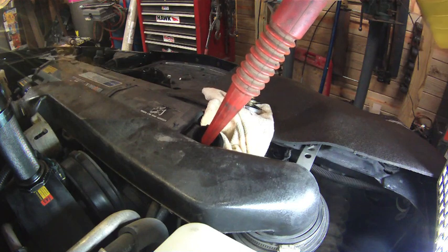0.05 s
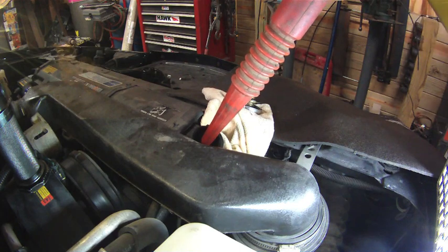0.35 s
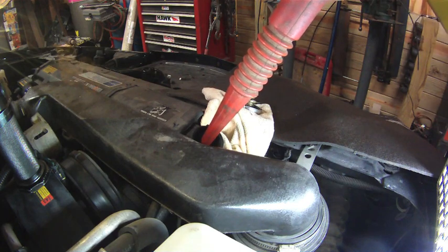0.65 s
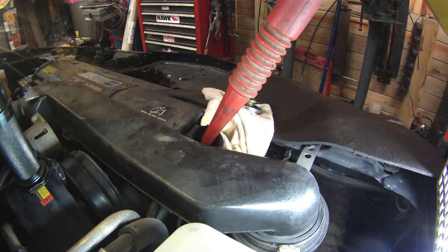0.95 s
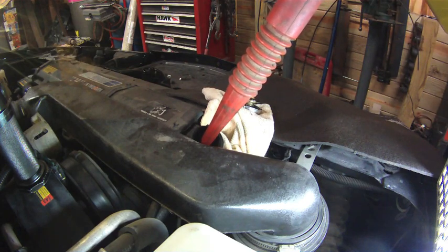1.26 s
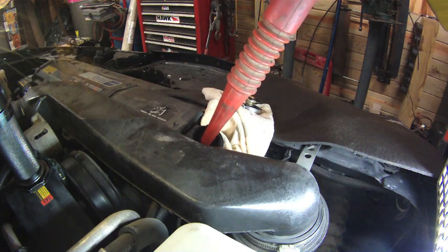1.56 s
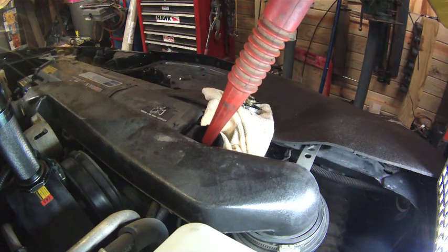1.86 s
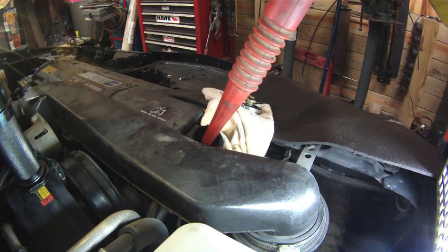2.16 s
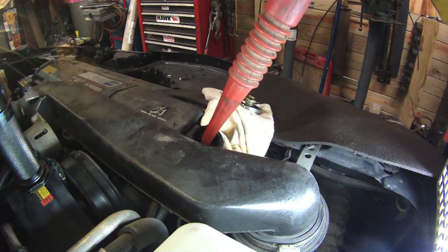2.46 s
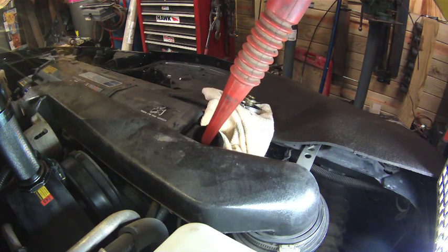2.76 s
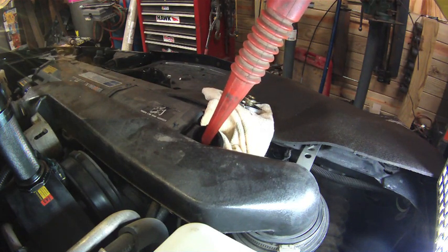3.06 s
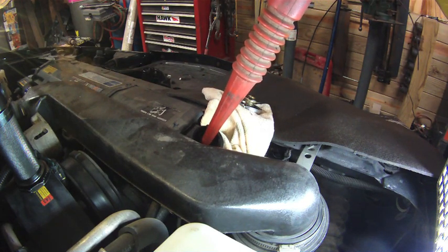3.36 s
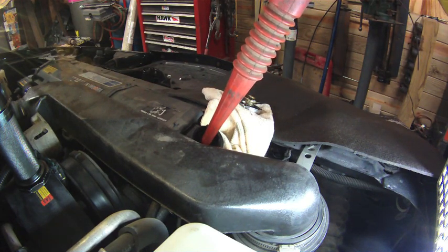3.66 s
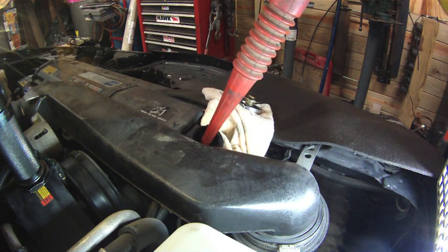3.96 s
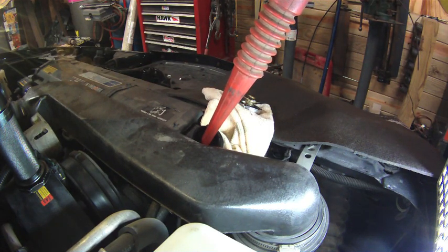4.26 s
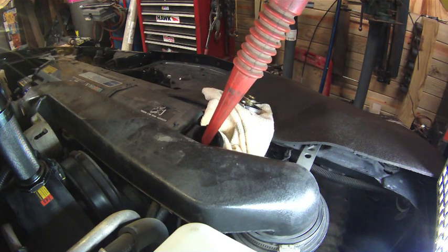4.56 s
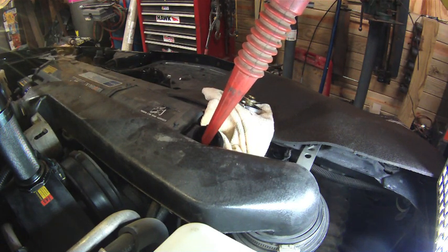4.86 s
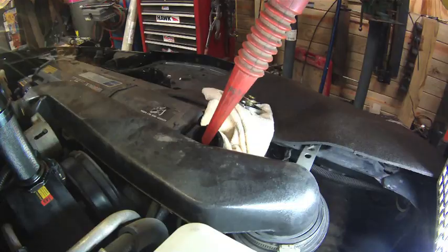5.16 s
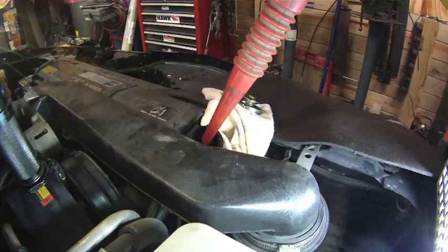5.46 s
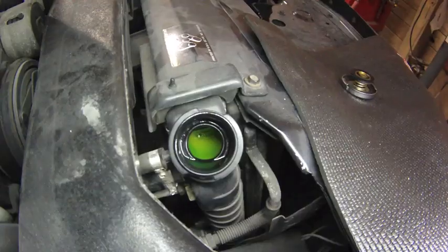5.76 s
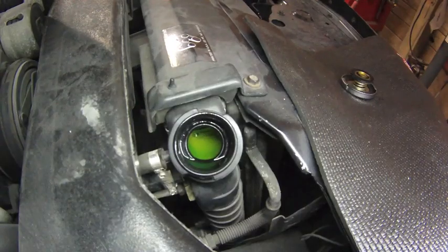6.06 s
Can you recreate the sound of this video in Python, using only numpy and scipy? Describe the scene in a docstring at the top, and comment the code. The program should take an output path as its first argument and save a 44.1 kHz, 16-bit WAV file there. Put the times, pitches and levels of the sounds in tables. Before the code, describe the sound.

Close to a car radiator in a quiet garage, a plastic spout briefly scuffs and knocks in the filler neck. A few drips lead into a trickle of coolant, then the pour gurgles as air glugs unevenly back up the spout, with fine fizz and spatter. The biggest gulps come near the end and ring hollowly in the jug. The pour cuts off abruptly, leaving very faint room tone.

```python
"""A garage, one microphone close to a car radiator: coolant is poured in from a plastic jug. Over room hiss and
a low drone, the ribbed spout scuffs and knocks into the filler neck. Drips and a trickle start; from 1.3 s air
glugs back up the spout, each bubble thumping and chirping in its air column amid fizz and spatter. Near 5 s the
biggest gulps set the jug ringing. At 5.8 s all sound stops abruptly and a much quieter room tone follows."""
import sys
import numpy as np
from scipy import signal
from scipy.fft import rfft, irfft, next_fast_len
from scipy.io import wavfile
from scipy.ndimage import uniform_filter1d

SR = 44100
rng = np.random.default_rng(int(sys.argv[2]) if len(sys.argv) > 2 else 0)


def log_audio(samples):
    """Write samples as a 16-bit WAV file to the path given in sys.argv[1]."""
    # one column per channel
    frames = np.atleast_2d(samples).T
    # limit to full scale, then quantise
    limited = np.clip(frames, -1, 1)
    pcm = np.round(limited * 32767).astype(np.int16)
    wavfile.write(sys.argv[1], SR, pcm)


N = 269300
TIME = np.arange(N) / SR


def from_db(db):
    """Decibels to gain."""
    return 10 ** (np.asarray(db) / 20)


def peak_one(x):
    """Scale to peak 1."""
    return x / (np.abs(x).max() + 1e-12)


def gains(rows):
    """Columns of dB over time, as gains at every sample."""
    times, *columns = np.transpose(rows)
    return [from_db(np.interp(TIME, times, db)) for db in columns]


def add(track, s, sound):
    """Mix a sound in at time s."""
    at = int(np.clip(s * SR, 0, N - 1))
    track[at:at + len(sound)] += sound[:N - at]


def band(x, low_hz, high_hz, order=2):
    """Butterworth band-pass."""
    sos = signal.butter(order, [low_hz, high_hz], "band", fs=SR, output="sos")
    return signal.sosfilt(sos, x + 1e-18)


def coloured(x, spectrum):
    """Give a steady sound a smooth spectrum; rms 1."""
    hz, db = np.transpose(spectrum)
    size = next_fast_len(N)
    bins = np.maximum(np.fft.rfftfreq(size, 1 / SR), 1)
    shape = from_db(np.interp(np.log(bins), np.log(hz), db))
    low_cut = np.minimum(bins / hz[0], 1) ** 2
    shaped = irfft(rfft(x, size) * shape * low_cut, size)[:N]
    return shaped / np.sqrt(np.mean(shaped ** 2) + 1e-20)


def resonate(x, modes, stretch=1):
    """Parallel resonances whose pitches all follow one ratio."""
    stretched_time = np.cumsum(stretch * np.ones(N)) / SR
    out = 0
    for hz, width_hz, db in modes:
        pole = np.exp(-np.pi * width_hz / SR)
        carrier = np.exp(2j * np.pi * hz * stretched_time)
        ring = signal.lfilter([1 - pole], [1, -pole], x / carrier + 1e-18)
        out = out + from_db(db) * 2 * np.real(carrier * ring)
    return out


def evened(x, span_s):
    """Hold the slow level near rms 1, keeping the grain."""
    power = np.abs(uniform_filter1d(x * x, int(span_s * SR)))
    return x / np.sqrt(power + np.mean(x * x) / 100)


def clicks(per_s, spread_db):
    """Random impulses of uneven size and sign."""
    sizes = from_db(spread_db * np.clip(rng.standard_normal(N), -2, 2))
    return sizes * rng.choice([-1, 1], N) * (rng.random(N) < per_s / SR)


def clumps(per_s, depth_db):
    """A gain that swells and sinks at random."""
    knots = np.clip(rng.standard_normal(1000), -2, 2)
    return from_db(depth_db * np.interp(TIME * per_s, np.arange(len(knots)), knots))


# room tone after the pour: (frequency [Hz], relative level [dB])
STILL_SPECTRUM = [(24, -47.5), (40, -9.5), (113, -28), (132, -0.5), (153, -12.5), (177, -10), (306, -10.5),
                  (597, -15.5), (765, -9), (2110, -24.5), (15000, -35.5)]
def still_room():
    """A very faint room tone comes in as everything else stops abruptly."""
    fade_in = np.interp(TIME, [5.78, 5.82, 5.88], [0, .25, 1])
    return from_db(-73.5) * coloured(rng.standard_normal(N), STILL_SPECTRUM) * fade_in


# garage hiss all around the microphone: (frequency [Hz], relative level [dB])
HISS_SPECTRUM = [(60, -7), (130, -9), (250, -8), (400, -6.5), (800, -10.5), (1500, -18), (2600, -22.5),
                 (5000, -26), (10000, -28), (15000, -30)]
# drone in the building: (time [s], deep band level [dB], upper band relative level [dB])
DRONE_LEVELS = [(0.0, -64, -77), (0.08, -76, -61), (0.27, -77, -70), (0.51, -66, -72), (1.33, -76, -63.5),
                (1.41, -77, -73.5), (3.53, -85, -84), (4.52, -77, -68.5), (5.76, -83, -81.5)]
def background():
    """Room hiss and a wavering drone of two narrow noise bands."""
    deep_gain, upper_gain = gains(DRONE_LEVELS)
    hiss = band(coloured(rng.standard_normal(N), HISS_SPECTRUM), 65, 17000)
    deep = evened(band(rng.standard_normal(N), 39, 49.6), span_s=0.18)
    upper = evened(band(rng.standard_normal(N), 121, 133), span_s=0.15)
    return from_db(-60.5) * hiss + deep_gain * deep + from_db(-1.5) * upper_gain * upper


def garage(x, t60_s, wet_db):
    """Diffuse reflections from the engine bay and wooden walls arrive 4 ms behind the direct sound."""
    t = TIME[:SR // 2]
    decay = from_db(-60 * t / t60_s) * (t > .004)
    tail = band(rng.standard_normal(len(t)), 207, 7400, order=1) * decay
    return x + from_db(wet_db) * signal.fftconvolve(x, tail / np.linalg.norm(tail))[:N]


# resonances of the rubbing spout: (frequency [Hz], width [Hz], gain [dB])
RUB_MODES = [(242, 50, -1.5), (375.5, 25, 7), (594, 35, 1.5), (1010, 210, -12.5), (1290, 70, -19),
             (1550, 120, -13.5), (1907, 47, -8.5)]
# knocks as it settles: (time [s], pitch [Hz], level [dB], time to fall 60 dB [s])
SPOUT_KNOCKS = [(0.001, 377.3, -33.5, 0.11), (0.217, 609, -35.5, 0.11)]
def scuff():
    """The plastic spout rubs evenly in the filler neck, knocks and comes to rest."""
    stop_s, fade_db_per_s = 0.22, 94
    level = from_db(-48 - fade_db_per_s * np.maximum(TIME - stop_s, 0))
    friction = band(clicks(per_s=900, spread_db=0), 100, 1970, order=3)
    out = level * evened(resonate(friction, RUB_MODES), span_s=0.02)
    t = TIME[:SR // 4]
    attack = 1 - np.exp(-t / 0.00085)
    for s, hz, db, t60_s in SPOUT_KNOCKS:
        add(out, s, from_db(db - 60 * t / t60_s) * attack * np.sin(2 * np.pi * hz * t))
    return out


def bubble(hz, swell_s, rise):
    """A bubble swells and dies, its pitch gliding through hz as it nears the surface."""
    age = TIME[:int(8 * swell_s * SR) + 2] / swell_s
    pitch = hz * np.exp(rise * np.tanh((age - 1) / 2))
    return age * np.exp(1 - age) * np.sin(2 * np.pi * np.cumsum(pitch) / SR)


def swarm(count, hz, octaves, spread_db, swell_s, rise, span_s):
    """Small bubbles of uneven pitch, size and life, held at an even overall level."""
    out = np.zeros(N)
    starts = rng.random(count) * N / SR
    for s, (pitch, size, life) in zip(starts, np.clip(rng.standard_normal((count, 3)), -2, 2)):
        tone = bubble(hz * 2 ** (octaves * pitch), swell_s * np.exp(0.43 * life), rise)
        add(out, s, from_db(spread_db * size) * tone)
    return evened(out, span_s)


# first drips into the neck: (time [s], relative level [dB])
FIRST_DRIPS = [(0.795, -47), (0.834, -33), (0.902, -39.5), (0.966, -36.5), (0.992, -42), (1.011, -36.5),
               (1.06, -35.5), (1.158, -40.5), (1.215, -38), (1.235, -37.5), (1.27, -38.5), (1.299, -38.5)]
def drips():
    """Each drip traps a small bubble of nearly the same size."""
    out = np.zeros(N)
    for (s, db), detune in zip(FIRST_DRIPS, rng.uniform(-1.14, 1, len(FIRST_DRIPS))):
        add(out, s, from_db(db) * bubble(hz=1820 * (1 + 0.061 * detune), swell_s=0.00344, rise=0.19))
    return out


SURFACE_HZ, TYPICAL_DB = 2000, -26.5   # a glug bubble's pitch at the surface; a middling glug
# coarse spatter and fine spray, each: (frequency [Hz], relative level [dB])
SPATTER_SPECTRUM = [(1400, -3.5), (1750, 5.5), (2200, 4), (2650, 1.5), (3200, -10), (3800, -12),
                    (4800, -18), (6500, -25.5), (15000, -68.5)]
SPRAY_SPECTRUM = [(3000, 0), (5000, -1), (7000, -3), (10000, -2.5), (12000, -17), (15000, -19)]
# larger bubbles bursting: (time [s], relative spatter level [dB], relative spray level [dB])
SURFACE_BURSTS = [(0.462, -46.5, -80), (0.532, -51, -79), (0.903, -43, -59), (2.118, -33, -84),
                  (2.921, -35, -54.5), (3.382, -34.5, -59), (3.893, -33.5, -65), (4.061, -33, -68),
                  (4.75, -23.5, -68), (5.115, -24, -60), (5.16, -29, -53)]
def splashes():
    """Glugs, drips and bursting bubbles each throw a short crackle of spatter and finer spray."""
    # strong bubbles, and high ones near the surface, throw more
    thrown = [(s, -35.5 + 0.42 * (db - TYPICAL_DB) + 10 * np.log2(hz / SURFACE_HZ))
              for s, db, hz, _ in AIR_GLUGS]
    thrown += [(s, db - 5) for s, db in FIRST_DRIPS]
    events = list(SURFACE_BURSTS) + [(s, db, db - 31) for s, db in thrown]
    spatter_gain, spray_gain, t = np.zeros(N), np.zeros(N), TIME[:SR // 10]
    burst = peak_one((1 - np.exp(-t / 0.0028)) * np.exp(-t / 0.008))
    for s, spatter_db, spray_db in events:
        add(spatter_gain, s, from_db(spatter_db - 11) * burst)
        add(spray_gain, s, from_db(spray_db - 2.5) * burst)
    spatter = coloured(clicks(per_s=2500, spread_db=1.5), SPATTER_SPECTRUM)
    spray = coloured(clicks(per_s=2000, spread_db=1.5), SPRAY_SPECTRUM)
    return spatter_gain * spatter + spray_gain * spray


def stirring(settle_s):
    """Agitation of the stream, 0-1: it jumps with each glug and settles back."""
    stir = np.zeros(N)
    for s, *_ in AIR_GLUGS:
        add(stir, s, np.exp(-TIME[:SR // 2] / settle_s))
    return np.minimum(stir, 1)


# bursting foam: (frequency [Hz], relative level [dB])
FOAM_SPECTRUM = [(2000, -16.5), (2700, 2), (3200, -0.5), (3800, -5.5), (4800, -5.5), (6200, -12.5),
                 (8500, -15), (10000, -16.5), (12000, -25.5), (15000, -18.5)]
# relative levels of the stream at the neck: (time [s], gurgle [dB], bubbling [dB], fizz [dB])
STREAM_LEVELS = [(0.75, -66, -54, -55), (1.07, -62, -59.5, -67), (1.36, -52, -59.5, -58.5),
                 (1.53, -54, -53.5, -65), (3.09, -55, -50.5, -62), (3.28, -52.5, -55, -64),
                 (4.18, -53, -50, -62), (4.6, -52, -53, -61), (5.27, -57, -49, -63.5),
                 (5.63, -52.5, -52, -71), (5.76, -58.5, -52.5, -71)]
def stream():
    """The liquid gurgles and bubbles; above it foam fizzes, with tiny ticks and droplet pings."""
    stirred_db = np.outer([3, 3, 4], stirring(settle_s=0.06))
    gurgle_gain, bubbling_gain, fizz_gain = gains(STREAM_LEVELS) * from_db(stirred_db)
    flowing = np.interp(TIME, [0.69, 1], [0, 1])   # the trickle sets in
    full = np.interp(TIME, [1.36, 1.505], [0, 1])   # the spout fills and starts to draw air
    gurgle_gain *= full + from_db(-14.5) * (1 - full)
    fizz_gain *= full + from_db(-4.5) * (1 - full)

    kicks = evened(band(clicks(per_s=130, spread_db=3.5), 341, 1157), span_s=0.06)
    surges = evened(band(clicks(per_s=80, spread_db=4), 302, 445), span_s=0.063)   # ring the lowest mode
    trickle = swarm(3000, hz=1875, octaves=0.306, spread_db=4, swell_s=0.001, rise=0.037, span_s=0.09)
    foam = evened(coloured(clicks(per_s=1400, spread_db=0), FOAM_SPECTRUM), span_s=0.13)
    foam *= clumps(per_s=45, depth_db=4.5)
    ticks = swarm(1500, hz=4175, octaves=0.22, spread_db=8, swell_s=0.00071, rise=0.011, span_s=0.41)
    prickle = swarm(600, hz=9500, octaves=0.16, spread_db=5, swell_s=0.00044, rise=0.018, span_s=0.23)
    pings = swarm(420, hz=4656, octaves=0.2, spread_db=2.5, swell_s=0.00075, rise=0.023, span_s=0.45)
    plops = swarm(130, hz=636, octaves=0.2, spread_db=3.5, swell_s=0.00196, rise=0.4, span_s=0.3)

    gurgle = from_db(7) * kicks + from_db(-10) * surges + from_db(2) * plops
    liquid = gurgle_gain * gurgle + from_db(4.5) * bubbling_gain * trickle
    pops = (from_db(-8.5) * ticks + from_db(-17.5) * prickle) * clumps(per_s=32, depth_db=4.5)
    fizz = from_db(-4.5) * foam + pops + from_db(-10.5) * pings
    return flowing * liquid, flowing * fizz_gain * fizz


# air in the spout and in the jug, each: (nominal frequency [Hz], width [Hz], gain [dB])
SPOUT_MODES = [(349.5, 16, 9), (596, 28, -6.5), (813, 34, -15.5), (898, 22, -2), (1189.7, 35.8, 3.5),
               (1247, 35, -16.5), (1645, 33, 2), (1755, 61, -4), (1940, 53, -6), (2158, 25, -5.5),
               (2546, 55, -2)]
JUG_MODES = [(417, 24, -1.5), (644, 32, -1.5), (962, 25, 10), (1289, 24, 10.5), (1688, 26, 3),
             (1809, 18, 7), (1995, 18, 0), (2350, 17, -1)]
# air gaps after the biggest gulps: (time [s], wait before closing [s], pitch lift [share of nominal])
GULP_GAPS = [(4.725, 0.14, 0.041), (5.066, 0.33, 0.09)]
def cavities(x):
    """Sounds in the liquid ring the spout, or mostly the jug while a gap over the liquid is open."""
    openness, opens_s, closes_s, lift_s = 0.85, 0.061, 0.067, 0.1
    gap, jug_ratio = 0, 0.94   # at rest: shut, and the jug below its nominal pitch
    for s, held_s, lift in GULP_GAPS:
        age = np.maximum(TIME - s, 0)
        opening, closing = age / opens_s, 1 - (age - held_s) / closes_s
        gap = gap + openness * np.clip(np.minimum(opening, closing), 0, 1)
        progress = (age / lift_s) ** 2
        jug_ratio = jug_ratio + lift * progress * np.exp(1 - progress)   # lifts and sinks back
    slosh = clumps(per_s=22, depth_db=0.3351)   # moving liquid keeps changing the air column's length
    return resonate(x * (1 - gap), SPOUT_MODES, slosh) + resonate(x * gap, JUG_MODES, slosh * jug_ratio)


# air glugging up the spout, levels relative: (time [s], bubble level [dB], pitch [Hz], thump level [dB])
AIR_GLUGS = [(1.335, -35, 1260, -30), (1.365, -13, 1400, -12), (1.435, -34, 1405, -25),
             (1.5428, -29.5, 1345, -21.5), (1.5726, -33, 687, -24), (1.617, -31, 2100, -21.5),
             (1.799, -31, 660, -40), (1.92, -27, 1176, -22), (1.942, -26.5, 1570, -36),
             (1.965, -21, 1435, -31), (2.116, -29.5, 1025, -26), (2.208, -31.5, 1220, -37),
             (2.31, -29, 1820, -23), (2.4966, -23.5, 1664, -35), (2.803, -23, 1270, -21.5),
             (2.922, -28, 1610, -25), (3.051, -20, 1650, -42), (3.075, -26, 1690, -52),
             (3.151, -35, 696, -24), (3.3627, -29.5, 1180, -20.5), (3.3828, -23, 1722, -31),
             (3.569, -30, 1024, -21), (3.709, -15, 1070, -14), (3.775, -27, 633, -32),
             (4.061, -10.5, 1130, -15.5), (4.127, -26, 1490, -52), (4.1709, -15.5, 1127, -16),
             (4.3006, -28.5, 1665, -47), (4.413, -33, 1580, -37), (4.7285, -22.5, 1030, -16),
             (4.749, -15.5, 1445, -37), (4.763, -15, 890, -16.5), (4.903, -23.5, 1398, -43),
             (5.059, -23, 1075, -22), (5.086, -10.5, 1000, -19.5), (5.109, -9, 1220, -29.5),
             (5.16, -19, 1050, -53), (5.4073, -18.5, 1180, -34), (5.478, -36, 830, -24),
             (5.52, -34, 1690, -24), (5.615, -28, 1505, -29), (5.666, -24.5, 1107, -24.5),
             (5.771, -20.5, 1162, -54)]
def glugs():
    """A bubble pinches off with a one-cycle pressure kick, then chirps towards its surface pitch."""
    thump_hz, thump_decay_s, climb_share = 707, 0.00081, 0.883
    out, t = np.zeros(N), TIME[:SR // 10]
    kick = np.sin(2 * np.pi * thump_hz * t) * np.exp(-t / thump_decay_s)
    thump = peak_one(band(kick, 357, 1110))
    for s, bubble_db, hz, thump_db in AIR_GLUGS:
        swell_s = 0.0024 * 2 ** ((TYPICAL_DB - bubble_db) / 26)   # strong bubbles pinch off faster
        rise = climb_share * np.log(SURFACE_HZ / hz)
        add(out, s, from_db(bubble_db) * bubble(hz, swell_s, rise))
        add(out, s, from_db(thump_db) * thump)
    return out


def scene():
    """Close by the filler neck, in mono: the pour until all sound stops abruptly, then a much quieter room
    tone."""
    gulps = glugs() + drips()
    flow, fizz = stream()
    direct = from_db(-16.5) * gulps + from_db(-13.5) * flow   # straight out of the filler neck
    sources = cavities(gulps + flow) + direct + splashes() + fizz + scuff()
    pour = garage(sources, t60_s=0.26, wet_db=-11.5) + background()
    cut = np.interp(TIME, [5.793, 5.813], [1, 0])
    return (pour * cut + still_room())[None]


def record(dry):
    """The microphone signal is cut steeply above 15.25 kHz."""
    return signal.sosfilt(signal.ellip(10, .1, 70, 15250, fs=SR, output="sos"), dry)


dry = scene()
out = record(dry)
log_audio(out)
```